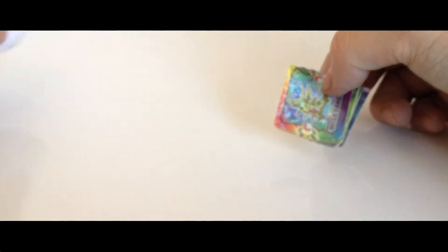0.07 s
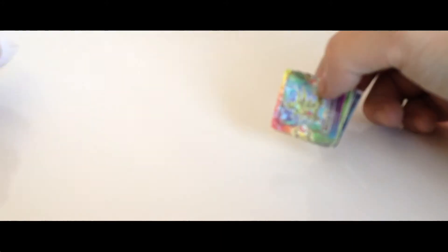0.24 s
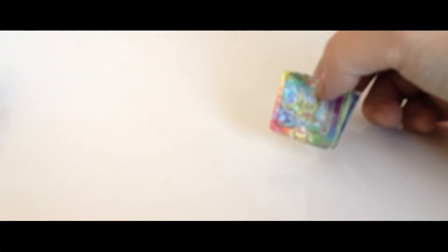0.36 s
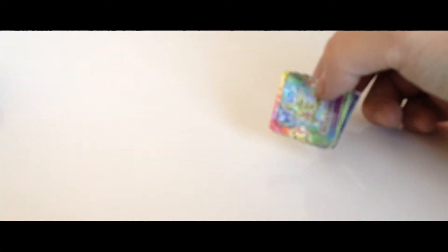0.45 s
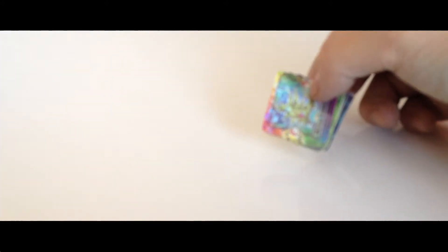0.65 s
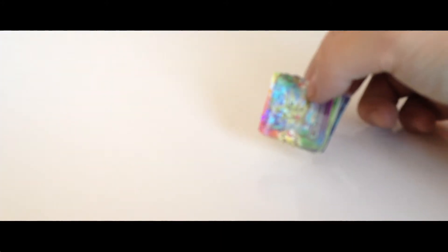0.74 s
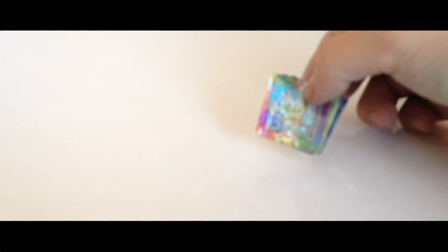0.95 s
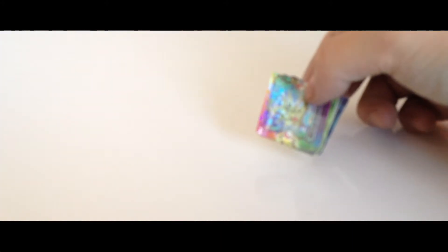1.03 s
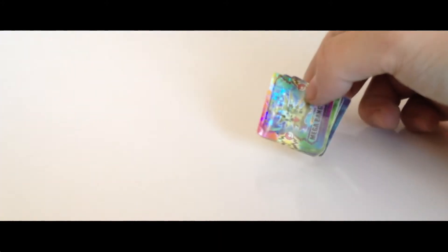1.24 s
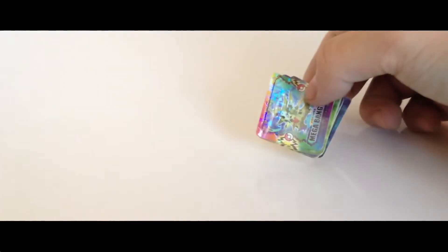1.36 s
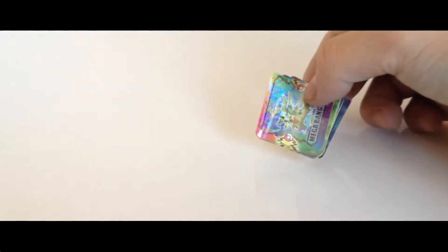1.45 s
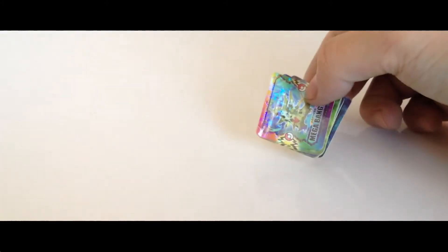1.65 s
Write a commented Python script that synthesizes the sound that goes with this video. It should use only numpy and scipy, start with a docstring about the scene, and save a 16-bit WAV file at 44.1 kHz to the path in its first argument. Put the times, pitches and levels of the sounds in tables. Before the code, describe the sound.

A small stack of stiff cards hits a tabletop with one firm, sharp tap at about 0.2 seconds. Fingers faintly rub and nudge the stack until a lighter tap at 1.1 seconds. Around 1.4 seconds the cards clatter quickly with a tiny squeak, then settle with faint ticks until 1.7 seconds. The small, quiet room rings briefly over a faint low rumble and hiss.

```python
"""A small stack of stiff cards is tapped on its edge against a tabletop: one firm tap, a light one,
then a quick clatter as the cards settle. Each hit makes the table ring, bends the stack and clicks
the card edges; in the clatter one card squeaks against its neighbour. Between the taps, fingers
nudge and rub the stack. A small, quiet room rings briefly over a low rumble and hiss."""
import sys
import numpy as np
from scipy import signal
from scipy.fft import rfft, irfft, next_fast_len
from scipy.io import wavfile
from scipy.ndimage import uniform_filter1d

SR = 44100
rng = np.random.default_rng(int(sys.argv[2]) if len(sys.argv) > 2 else 0)


def digitize_waveform(pressure):
    """Quantize a signal to 16-bit integers and store it at the path in sys.argv[1].

    Rows of a 2-D input are taken as channels; values are limited to [-1, 1].
    """
    field = np.atleast_2d(pressure).T
    bounded = np.clip(field, -1, 1)
    quanta = np.round(bounded * 32767).astype(np.int16)
    wavfile.write(sys.argv[1], SR, quanta)


N = 74970


def gain(db):
    """Turn decibels into a number to multiply by."""
    return 10 ** (np.asarray(db) / 20)


def curve_at(points, hz):
    """Read between (f/Hz, value) points, with octaves evenly spaced."""
    freqs, values = np.array(points, float).T
    return np.interp(np.log(hz + 1), np.log(freqs), values)


def shape(x, gain_at):
    """Scale each frequency by gain_at(hz), without smearing the sound back in time."""
    size = 2 * next_fast_len(len(x))
    hz = np.arange(size // 2 + 1) * SR / size
    cepstrum = irfft(np.log(gain_at(hz) + 1e-9))
    # folding it in half makes the filter respond only after its input
    cepstrum[1:size // 2] *= 2
    cepstrum[size // 2 + 1:] = 0
    return irfft(rfft(x, size) * np.exp(rfft(cepstrum)))[:len(x)]


def colour(x, points):
    """Filter a sound by a curve of (f/Hz, level/dB) points."""
    return shape(x, lambda hz: gain(curve_at(points, hz)))


def fade(t, t60):
    """A smooth fade that falls by 60 dB every t60 seconds."""
    return np.exp(-np.log(1000) * t / t60)


def unit_energy(x):
    """Scale a sound so that its energy is 1."""
    return x / np.sqrt(np.sum(x ** 2))


def place(sounds):
    """Lay (start/s, sound) pairs on the time line."""
    out = np.zeros(N)
    for start, x in sounds:
        i = int(start * SR)
        out[i:i + len(x)] += x[:N - i]
    return out


def ring(t, tones, detune=0.003):
    """A struck object's own fading tones, tuned a little differently each time."""
    out = np.zeros(len(t))
    for k, (hz, db, t60) in enumerate(tones):
        pitch = hz * (1 + detune * rng.standard_normal())
        out += (-1) ** k * gain(db) * fade(t, t60) * np.sin(2 * np.pi * pitch * t)
    return out


def burst(t, t60, rise_s=0.0012):
    """Tones so crowded that they blur into noise, swelling and dying quickly."""
    return unit_energy(rng.standard_normal(len(t)) * fade(t, t60) * (1 - np.exp(-t / rise_s)))


def background():
    """The room's low rumble and hiss, drifting slightly in level."""
    # tone of the noise: f/Hz, relative level/dB
    spectrum = [(20, -19), (50, -27.5), (65, -16.5), (85, -21.5), (112, -6), (150, -2), (195, -6),
                (250, -6), (410, -12), (560, -16.5), (1080, -21), (1500, -21), (3000, -25.5), (6000, -29),
                (10000, -34.5), (13000, -33.5), (15500, -29)]
    # its loudness over time: t/s, level/dB
    levels = [(0, -65), (.2, -65.5), (.5, -62.5), (.75, -64.5), (1.0, -64.5), (1.349, -65), (1.7, -64)]
    noise = colour(rng.standard_normal(N), spectrum)
    level_db = np.interp(np.arange(N) / SR, *np.array(levels).T)
    return noise / np.std(noise) * gain(level_db)


def room(x, length_s=0.7, rise_s=0.0071):
    """A small room's echoes blur into a tail; the highest treble dies first."""
    # how long the room rings: f/Hz, t60/s
    decays = [(200, 0.32), (500, 0.39), (1000, 0.34), (2500, 0.27), (5000, 0.4), (10000, .24),
              (16000, 0.053)]
    t = np.arange(int(length_s * SR)) / SR
    spectrum = rfft(rng.standard_normal(len(t)))
    hz = np.fft.rfftfreq(len(t), 1 / SR)
    centres = [f for f, _ in decays]
    tail = np.zeros(len(t))
    for one_band, (_, t60) in zip(np.eye(len(centres)), decays):
        band = curve_at(list(zip(centres, one_band)), hz)
        tail += irfft(spectrum * band, len(t)) * fade(t, t60)
    tail *= 1 - np.exp(-(t / rise_s) ** 2)
    return signal.fftconvolve(x, unit_energy(tail))[:N]


def rubbing(strokes, spectrum, uneven_db=1.5):
    """Friction makes faint swells of noise, roughened by an uneven grip."""
    t = np.arange(N) / SR
    pressure = sum(gain(db) * np.exp(-(2 * (t - at) / length) ** 2) for at, length, db in strokes)
    grip = uniform_filter1d(rng.standard_normal(N), size=300)
    friction = pressure * rng.standard_normal(N) * gain(uneven_db * grip / np.std(grip))
    tone = unit_energy(colour(signal.unit_impulse(SR // 10), spectrum))
    return signal.fftconvolve(friction, tone)[:N]


def fingers():
    """Fingers rub, slide and nudge the stack between the taps."""
    # rubs on the cards and ticks of settling edges: t/s, length/s, level/dB
    rubs = [(0.66, 0.13, -80), (0.736, 0.035, -73.5), (1.034, 0.015, -70), (1.385, 0.013, -72),
            (1.564, .004, -63.5), (1.572, 0.005, -74), (1.607, .004, -67.5), (1.622, .004, -72),
            (1.650, .005, -71), (1.694, 0.0045, -73)]
    # their tone: f/Hz, level/dB
    rub_tone = [(300, 9.5), (2000, -12), (7000, -8), (9600, 1), (11500, -7), (16000, -10)]
    # soft slides on the table: t/s, length/s, level/dB
    slides = [(0.438, 0.016, -63), (0.60, 0.13, -70.5), (0.66, 0.042, -69), (0.735, 0.036, -71),
              (0.845, 0.047, -64)]
    # their tone: f/Hz, level/dB
    slide_tone = [(100, -51), (400, 2), (700, -2.5), (1050, 5.5), (1500, -14), (2400, -18), (3500, -33),
                  (16000, -27)]
    # dull, low bumps: t/s, length/s, level/dB
    bumps = [(0.325, 0.045, -63.5), (1.07, 0.074, -64.5), (1.305, 0.051, -65), (1.52, .05, -67.5)]
    # their tone: f/Hz, level/dB
    bump_tone = [(50, -48), (100, -17), (148, -9.5), (200, -19), (400, -37), (2000, -51)]
    return rubbing(rubs, rub_tone) + rubbing(slides, slide_tone) + rubbing(bumps, bump_tone)


def squeak(hz=6180, t60=0.03):
    """One card slips along its neighbour, each slip a thin, short ring."""
    # slips: t/s, level/dB
    slips = [(1.4092, -50), (1.421, -52), (1.428, -49), (1.437, -58)]
    t = np.arange(SR // 10) / SR
    return place((start, ring(t, [(hz, db, t60)], detune=0.0051)) for start, db in slips)


def table_knock(t, echo_ms):
    """A blow rings the tabletop; its bending wave comes back from the table's edge, followed by a few later
    echoes."""
    # later echoes: delay/s, level/dB
    echoes = [(.0066, -4), (0.011, -17.5)]
    # tone of the knock: f/Hz, level/dB
    knock_tone = [(50, -37), (200, -16), (340, -8), (450, -11.5), (545, -26), (640, -4.5), (850, 2),
                  (1050, -4), (1400, -4.5), (1900, -3), (2300, -0.5), (3000, -6.5), (3700, -20.5),
                  (4900, -15.5), (5900, -30), (16000, -36)]
    # the tabletop's own tones: f/Hz, level/dB, t60/s
    table_tones = [(338.4, -37, 0.15), (387.7, -36.5, 0.12), (452.2, -31.5, 0.091), (635.5, -33, 0.051),
                   (704.5, -30.5, 0.05), (817.5, -29, 0.079), (858.7, -27, 0.054), (1071, -24.5, 0.041),
                   (1195, -33, 0.033), (1446, -33, 0.077), (1725, -34.5, 0.041), (1900, -37.5, 0.11),
                   (2176, -28, 0.068), (2517, -23.5, 0.038)]
    strike = signal.unit_impulse(len(t))
    for delay, db in [(echo_ms / 1000, -1.5), *echoes]:
        strike[int(delay * SR)] += gain(db)
    blow = gain(4.5) * burst(t, t60=0.043) + gain(9) * strike
    return colour(blow, knock_tone) + ring(t, table_tones)


def edge_click(t):
    """The card edges click: bright noise and a few very high tones."""
    # tone of the noise: f/Hz, level/dB
    click_tone = [(100, -43), (500, -23), (3000, -3), (5000, -11), (7000, -8.5), (8400, -11.5), (9300, 1),
                  (11000, -8), (13000, -9), (14500, -12), (16000, -19)]
    # the edges' own tones: f/Hz, level/dB, t60/s
    edge_tones = [(9080, -40, 0.026), (9560, -42, 0.022), (10700, -48, 0.024), (12400, -58, .025)]
    return colour(gain(-11) * burst(t, t60=0.037), click_tone) + ring(t, edge_tones)


def tap(db, bright_hz, bass_db, bend_db, click_db, echo_ms):
    """One hit: the table knocks, the edges click and the stack rings as it bends."""
    # tones of the bending stack: f/Hz, level/dB, t60/s
    bend_tones = [(794, -33.5, 0.071), (994, -41, 0.051), (1822, -30, 0.041), (2258, -24.5, 0.021),
                  (2630, -28, 0.026), (3153, -30, 0.041), (3600, -41.5, .035), (3900, -51, 0.038)]
    # bright tones that take a firm blow to be heard: f/Hz, level/dB, t60/s
    firm_tones = [(4590, -56, 0.034), (4920, -49, 0.038), (5180, -48, 0.023), (14200, -53, .04)]

    def contact(hz, bass_below_hz=1100):
        """Each hit has its own amount of bass and loses treble above bright_hz."""
        bass = gain(bass_db / (1 + (hz / bass_below_hz) ** 4))
        return bass / np.sqrt(1 + (hz / bright_hz) ** 4)

    t = np.arange(SR // 4) / SR
    knock = shape(table_knock(t, echo_ms), contact)
    click = gain(click_db) * edge_click(t)
    bend = gain(bend_db) * ring(t, bend_tones)
    firm = gain(db) * ring(t, firm_tones)  # scaled again below, so it grows as strength squared
    # the tabletop gives off little deep bass
    low_cut = signal.butter(1, 177, "high", fs=SR, output="sos")
    return gain(db) * signal.sosfilt(low_cut, knock + bend + click + firm)


def cards():
    """The stack hits the table again and again, then settles."""
    # hits: t/s, level/dB, brightness/Hz, bass/dB, bend/dB, click/dB, first echo/ms
    hits = [(0.2350, 0.5, 2500, 0.5, -9.5, -1, 2.74), (0.434, -36.5, 1940, 3.5, -6, 4, 3.6),
            (0.8436, -38, 1000, 7.5, -19, -2, 2.3), (1.0839, -32, 970, 12, -29, -3, 2.1),
            (1.0938, -15, 3080, 4, 4.5, 2.5, 2.27), (1.4092, -15.5, 990, 6.5, -34, 0.5, 2.42),
            (1.4206, -13.5, 3000, 3.5, 0.5, 6, 2.07), (1.4281, -26.5, 2400, 3, 12, 3, 2.17),
            (1.438, -16.5, 830, 11.5, -15, 6.5, 2.4), (1.4415, -24, 786, 11, -23, -18, 2.22),
            (1.4531, -12.5, 2640, 1, -4, 6, 2.33), (1.461, -17, 1600, 4.5, -11, -18, 2.39),
            (1.566, -30.5, 950, 0, -20, -16, 2.2), (1.609, -31, 970, -4, -18, -14, 2.95),
            (1.655, -36.5, 910, 2.5, -18, -12, 4.3)]
    return place((start, tap(*hit)) for start, *hit in hits)


def scene():
    """Cards and fingers in the quiet room, in one channel."""
    direct = cards() + fingers()
    return (direct + gain(-12.5) * room(direct) + squeak() + background())[None]


def record(dry):
    """The recorder cuts off the very highest treble."""
    top_hz = 15900
    return signal.sosfilt(signal.ellip(10, 0.2, 70, top_hz, fs=SR, output="sos"), dry)


dry = scene()
out = record(dry)
digitize_waveform(out)
```